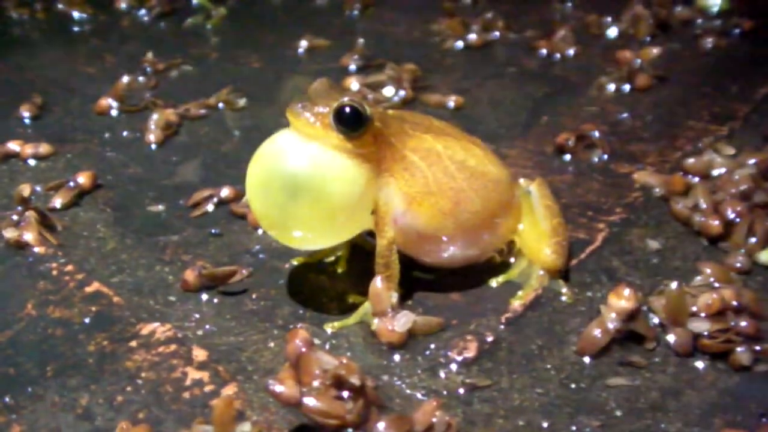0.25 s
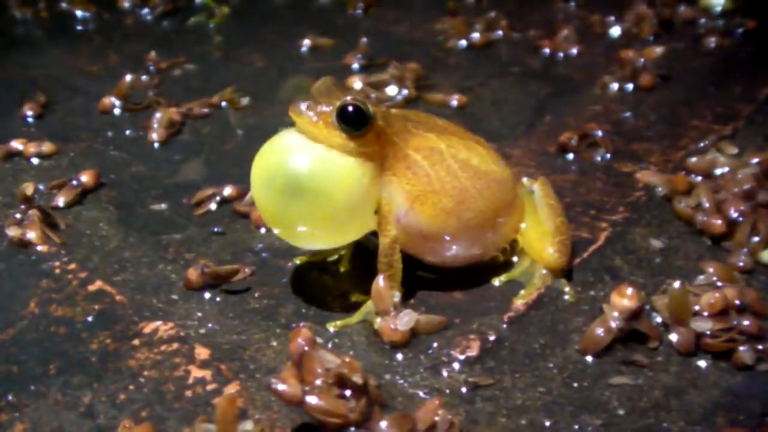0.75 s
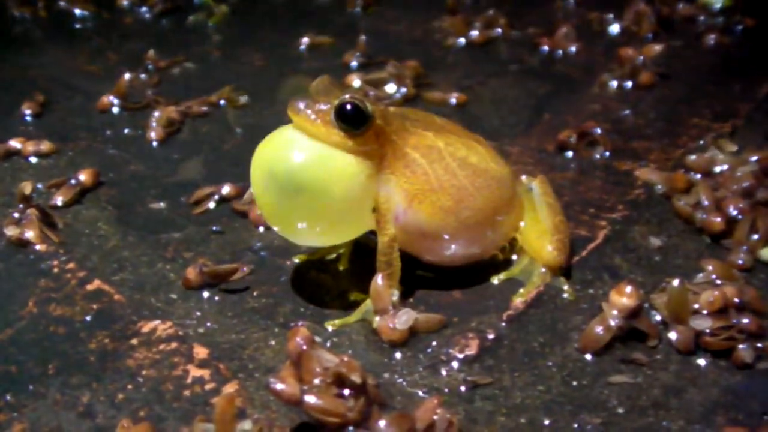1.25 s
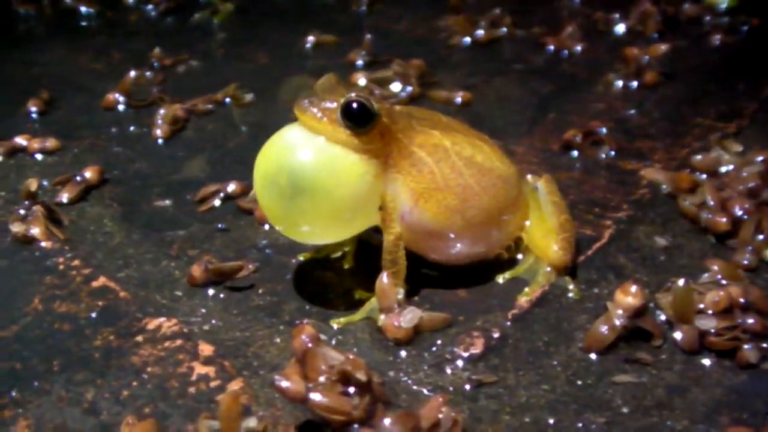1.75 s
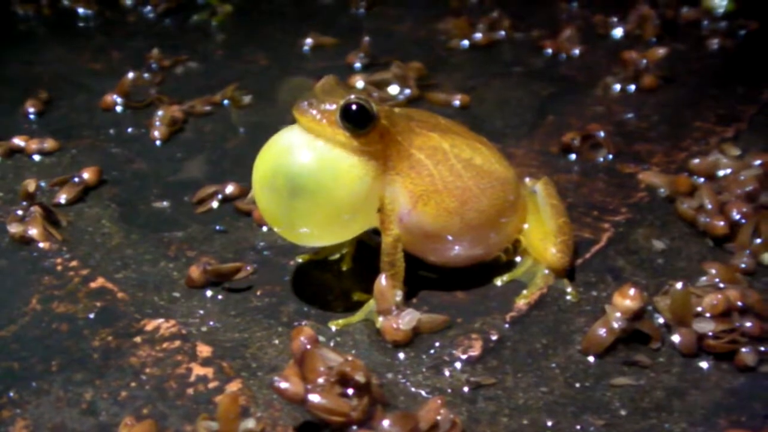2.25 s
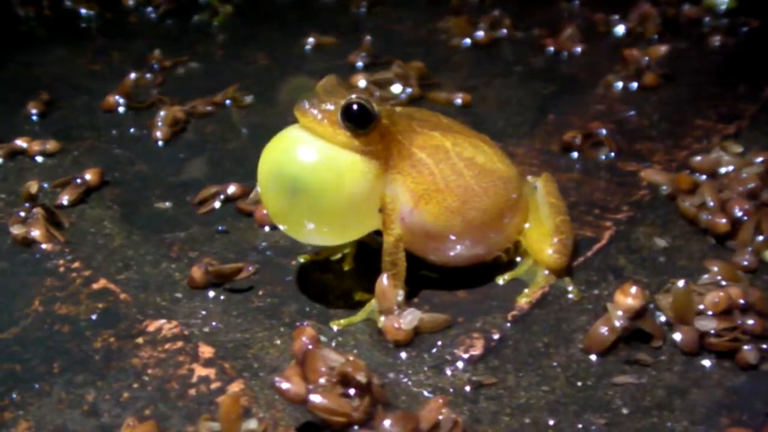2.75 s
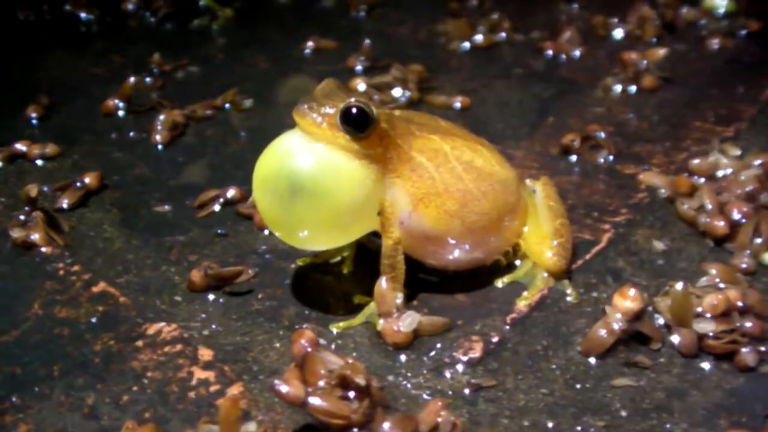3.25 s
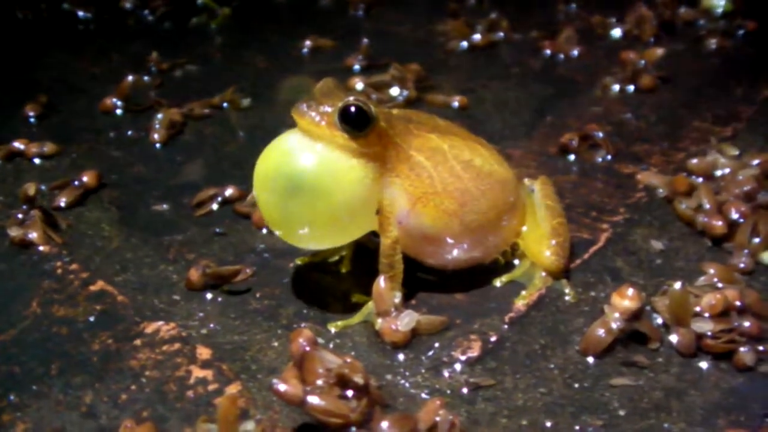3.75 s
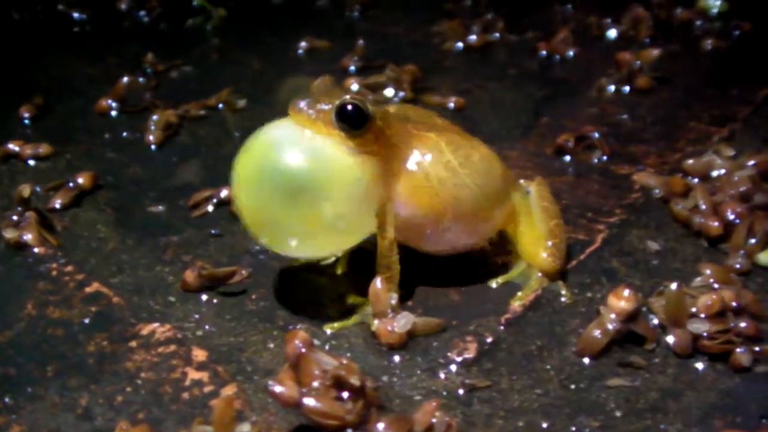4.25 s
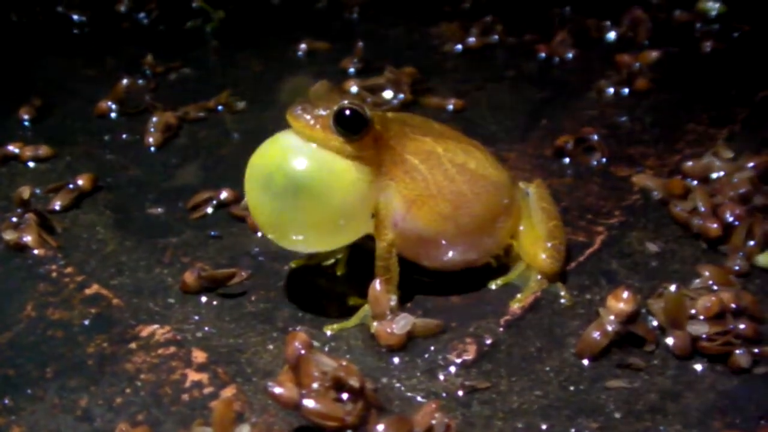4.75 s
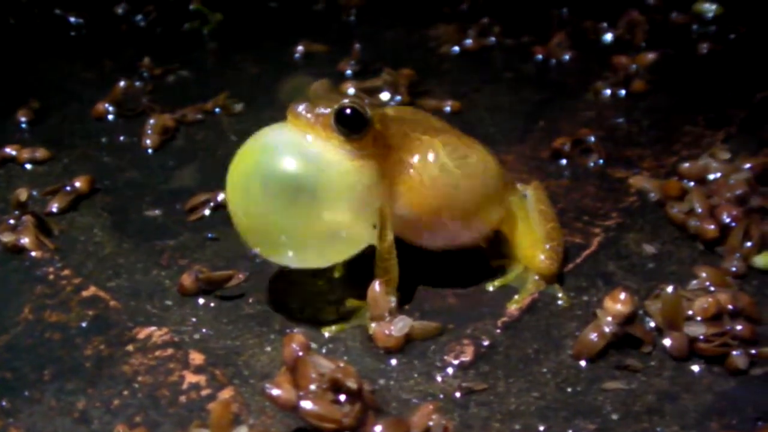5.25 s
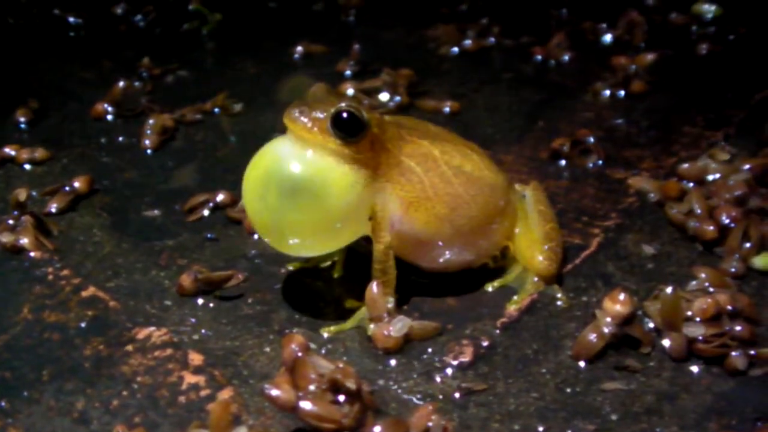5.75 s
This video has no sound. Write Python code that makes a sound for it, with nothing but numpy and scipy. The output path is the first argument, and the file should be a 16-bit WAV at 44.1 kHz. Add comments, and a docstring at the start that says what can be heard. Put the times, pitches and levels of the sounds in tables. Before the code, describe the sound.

Quiet wet night with distant frogs, insect trill and water drips, then three piercing, overloaded close frog chirps, each a fast rising buzz.

```python
"""A small tree frog calls from wet ground at night, a hand's width from the microphone and a little left.
Each note is a buzz of about 240 pulses a second that climbs in pitch and ends in one long pure pulse.
Neighbours call the same note from farther off, with more echo; one whistle rises, and far frogs peep.
Behind them lie a thin insect trill, water drips as short noise bursts, a far chorus and an even hiss.
Close notes overload the microphone into buzz and rasp, and its gain control ducks the night."""
import sys
import numpy as np
from scipy import signal
from scipy.fft import rfft, irfft
from scipy.io import wavfile
from scipy.ndimage import uniform_filter1d, minimum_filter1d

SR = 44100
rng = np.random.default_rng(int(sys.argv[2]) if len(sys.argv) > 2 else 0)


def master(y):
    """Save y as 16-bit WAV."""
    cut = np.clip(np.atleast_2d(y).T, -1, 1)
    pcm = np.round(cut * 32767)  # scale
    wavfile.write(sys.argv[1], SR, pcm.astype(np.int16))


N = 265041
TIME = np.arange(N) / SR   # s

# shape of the night's hiss: pitch_hz, relative level_db per Hz
HISS_SHAPE = [(30, -16), (60, -5), (120, 3), (260, -7), (400, 2.5), (600, -2.5), (1200, -2), (3000, -2.5),
              (5500, -1.5), (7000, -7.5), (8600, -12), (10500, -2), (12500, 0), (15500, -13.5)]
HISS_DB = -51   # level of the whole hiss
# how alike the hiss is at left and right: pitch_hz, likeness (0-1)
HISS_LIKENESS = [(60, 0.51), (150, 0.73), (380, 0.8), (950, 0.43), (2380, 0.72), (5980, 0.04),
                 (15000, 0.12)]
# far chorus of frogs and insects: centre_hz, width_hz, level_db, flutter_db (either way)
FAR_CHORUS = [(407, 73, -66, 7.5), (2133, 160, -66, 6.5), (4285, 345, -52, 10.5), (6253, 92, -63, 9.5),
              (5940, 600, -64.5, 10)]
# level of the nearer insect's trill: time_s, level_db
TRILL_LEVEL = [(0, -56.5), (1.08, -54), (1.22, -61), (3.8, -61), (4.7, -49), (6, -66)]
# the clearest drips on leaves and mud: start_s, level_db (tick and thud), struck_spot_hz, spray_db
DRIPS = [(0.841, -32, 407, -42), (0.871, -31.5, 1770, -51), (1.049, -59, 503, -38.5),
         (2.173, -24.5, 1580, -52), (2.197, -35, 1830, -59), (2.469, -29, 420, -65), (2.566, -31, 710, -66),
         (3.337, -37.5, 373, -55), (3.501, -38.5, 900, -64), (3.652, -38.5, 425, -52),
         (3.888, -56, 409, -42), (3.927, -39.5, 434, -61), (3.981, -59, 415, -39), (4.673, -28.5, 969, -45),
         (5.908, -44.5, 455, -40.5)]
# tick set ringing beside the struck spot: low_hz, high_hz, decay_s, gain_db
DRIP_TICK = (2950, 3500, 0.00093, 1.4)
# fine spray of a drip: low_hz, high_hz, decay_s, gain_db
DRIP_SPRAY = (8500, 14500, 0.0029, 2.5)
# two far frogs: pitch_hz, level_db (before echo), rise_hz_per_s, rattle_depth (0-1), peep_centres_s
FAR_PEEPERS = [(4487, -45, 600, .15, (.095, .515, .938, 1.365, 1.755, 2.112, 2.625, 2.975, 3.42, 3.975, 4.66, 5.81)),
               (4235, -42, 2600, .5, (.29, .73, 1.41, 1.69, 2.15, 2.47, 3.0, 3.82, 3.995, 5.59))]
RATTLE_HZ = 210   # rate of the rattle within a peep
PEEP_SPREAD_DB, PEEP_SPREAD_HZ = 1.0, 5.4   # how much one peep differs from the next
# path of the rising whistle: time_s, pitch_hz, level_db (before echo)
WHISTLE_PATH = [(2.401, 3250, -58), (2.429, 3453, -38), (2.477, 3577, -26.5), (2.502, 3672, -28.5),
                (2.534, 3590, -53)]
# neighbours' notes: first_pulse_s, last_pulse_s, level_db (with echo, before the sac), last_pulse_hz, voice
NEIGHBOUR_NOTES = [(-.05, 0.033, -24.5, 3932, "even"), (1.045, 1.124, -13.5, 3490, "swelling"),
                   (1.348, 1.436, -18, 3950, "even"), (1.616, 1.721, -21.5, 3830, "even"),
                   (2.54, 2.649, -16.5, 3904, "even"), (2.636, 2.712, -19, 3964, "even"),
                   (3.022, 3.1237, -4.5, 3664, "swelling"), (3.207, 3.279, -12.5, 3612, "swelling"),
                   (4.682, 4.769, -0.5, 3816, "swelling"), (4.775, 4.783, -3, 3880, "even"),
                   (4.825, 4.909, -15.5, 3930, "even"), (4.898, 4.988, -21, 3780, "swelling"),
                   (5.199, 5.28, 1.5, 3824, "even"), (5.384, 5.45, -21, 3953, "even"),
                   (5.565, 5.666, -21, 3835, "even"), (5.823, 5.922, -14, 3622, "swelling"),
                   (5.950, 6.027, -17.5, 3820, "even")]
# their two ways of calling, by voice: pulses_per_s, start_pitch and end_pitch of the buzz
# (shares of the last pulse's pitch), swell_db, last_pulse_db
NEIGHBOUR_VOICES = {"even": (234, .85, .935, 4.6, 1.9), "swelling": (261, 0.89, 0.9863, 19, 1)}
# fainter means farther and wetter: echo over direct sound for a 0 dB note, and its rise in dB per dB
NEAR_ECHO_DB, ECHO_RISE = -6.5, 0.73
# close frog's notes: first_pulse_s, last_pulse_s, pulses_per_s, level_db (before the sac),
# start_hz, end_hz, last_pulse_hz, swell_db
CLOSE_NOTES = [(4.2548, 4.3769, 246, 29.5, 3330, 3778, 3997, 11),
               (5.018, 5.1344, 240, 30, 3318, 3803, 3987, 8),
               (5.308, 5.3481, 244, 29, 3480, 3734, 4000, 20)]
# loose pulses as its larynx starts up: start_s, level_db (before the sac), length_s
CATCHES = [(4.2427, 4, 0.00046), (4.245, 7.5, 0.00065), (4.2482, 26.5, 0.0013), (5.005, 9, 0.00043),
           (5.012, 30.5, 0.00057), (5.2987, 7, 0.00065)]
CATCH_HZ = 3250   # pitch of those loose pulses
CUTOFF_HZ = 15750   # top of the recorded band


def from_db(db):
    """Decibels to gain."""
    return 10 ** (np.asarray(db) / 20)


def rms_one(x):
    """Scale to an rms of one."""
    return x / np.sqrt(np.mean(x ** 2) + 1e-20)


def at_hz(points, hz):
    """Read a spectrum on a log-frequency axis."""
    points_hz, values = np.array(points).T
    return np.interp(np.log(hz + 1), np.log(points_hz), values)


def band(x, low_hz, high_hz, order=2):
    """Butterworth band-pass."""
    edges = [low_hz, min(high_hz, SR / 2 - 1)]
    return signal.sosfilt(signal.butter(order, edges, "band", fs=SR, output="sos"), x + 1e-18)


def drift(rate):
    """Chance between -1 and 1, drawn anew `rate` times a second and joined by straight lines."""
    knots = rng.uniform(-1, 1, 1000)
    return np.interp(TIME * rate, np.arange(len(knots)), knots)


def delayed(x, delay_s):
    """The same sound, a little later."""
    return np.interp(TIME - delay_s, TIME, x)


def panned(x, pan_db):
    """Raise left over right by pan_db."""
    return x * from_db(np.array([[pan_db], [-pan_db]]) / 2)


def add(out, s, sound):
    """Mix a sound in at time s, trimmed to the ends."""
    at = round(s * SR)
    low, high = max(at, 0), min(at + sound.shape[-1], out.shape[-1])
    if high > low:
        out[..., low:high] += sound[..., low - at:high - at]


def stereo_pair(mid, side, alike):
    """Left and right noise that share a given likeness (0-1)."""
    alike = np.clip(alike, 0, 1)
    return np.sqrt(1 + alike) * mid + np.sqrt(1 - alike) * side * [[1], [-1]]


def foliage(x, echo_db, t60=0.26, build_s=0.00093, alike=0.44):
    """Direct sound plus a dense scatter from leaves and trunks, in stereo."""
    t = TIME[:SR * 3 // 4]
    scatter = stereo_pair(*rng.standard_normal((2, len(t))), alike)
    scatter = scatter * from_db(-60 * t / t60) * (1 - np.exp(-t / build_s))
    response = from_db(echo_db) * rms_one(scatter) / np.sqrt(len(t))
    response[:, 0] += 1   # the direct sound
    return signal.fftconvolve(x[None], response, axes=1)


def burst(low_hz, high_hz, decay_s, db, order=2):
    """A band of noise that starts to die at once."""
    t = TIME[:SR // 20]
    noise = band(rng.standard_normal(len(t)), low_hz, high_hz, order)
    return from_db(db) * rms_one(noise) * np.exp(-t / decay_s)


def hiss():
    """The night's even hiss: shaped noise whose left-right likeness depends on pitch."""
    hz = np.arange(N // 2 + 1) * SR / N
    mid, side = rfft(rng.standard_normal((2, N)))
    spectrum = stereo_pair(mid, side, at_hz(HISS_LIKENESS, hz)) * from_db(at_hz(HISS_SHAPE, hz))
    return from_db(HISS_DB) * rms_one(irfft(spectrum, N))


def far_chorus():
    """Many far frogs and insects merge into bands of fluttering noise."""
    out = np.zeros((2, N))
    for centre, width, db, flutter_db in FAR_CHORUS:
        # noise common to both sides plus stronger noise of each side's own
        noise = rng.standard_normal(N) + 2.05 * rng.standard_normal((2, N))
        voices = band(noise, centre - width / 2, centre + width / 2)
        out += from_db(db + flutter_db * drift(22)) * rms_one(voices)
    return out


def patter(drops_per_s=25, level_db=-65):
    """Distant drops: random clicks, dulled and scattered by the foliage."""
    drops = (rng.random(N) < drops_per_s / SR) * rng.standard_normal(N)
    dulled = band(drops, 320, 1760, order=1)
    return from_db(level_db) * rms_one(foliage(dulled, echo_db=-17, t60=0.16)[:, :N])


def insect():
    """One nearer insect: a thin line of noise that drops back after a second and returns later."""
    line = band(rng.standard_normal((2, N)), 5105, 5215)
    return from_db(np.interp(TIME, *np.transpose(TRILL_LEVEL))) * rms_one(line)


def drips(spread=1.24, thud_cycles=1.91, thud_db=-1):
    """Each drop gives a tick, a thud that dies within a few cycles, and a little spray."""
    out = np.zeros((2, N))
    for s, db, hz, spray_db in DRIPS:
        thud = burst(hz / spread, hz * spread, thud_cycles / hz, thud_db, order=1)
        blow = thud + burst(*DRIP_TICK)
        drop = from_db(db) * blow + from_db(spray_db) * burst(*DRIP_SPRAY)
        add(out, s, foliage(drop, echo_db=-7.0, t60=0.073))
    return out


def peepers(width_s=0.024, lower_db=-14):
    """Short rising peeps, a little rattly, strongest on their second harmonic and blurred by distance."""
    out = np.zeros((2, N))
    t = TIME[:SR // 8] - 1 / 16   # zero at the middle of the peep
    for hz, db, rise, rattle, times in FAR_PEEPERS:
        chance = rng.standard_normal((len(times), 2)) * [PEEP_SPREAD_DB, PEEP_SPREAD_HZ]
        shape = np.exp(-(t / width_s) ** 2) * (1 + rattle * np.sin(2 * np.pi * RATTLE_HZ * t))
        for s, (strong_db, sharp_hz) in zip(times, chance):
            phase = np.pi * t * (hz + sharp_hz + rise * t / 2)   # of the fundamental, at half the pitch
            peep = shape * (np.sin(2 * phase) + from_db(lower_db) * np.sin(phase))
            add(out, s + t[0], from_db(db + strong_db) * foliage(peep, echo_db=0.5, t60=0.2))
    return panned(out, 5.0)


def voiced(phase, second_db=-27):
    """The fundamental and a trace of its octave."""
    return np.sin(phase) + from_db(second_db) * np.sin(2 * phase)


def whistler():
    """One smooth upward whistle: a gliding tone that sags slightly as it fades."""
    s, hz, db = np.transpose(WHISTLE_PATH)
    level = np.interp(TIME, s, from_db(db), 0, 0)
    tone = level * voiced(2 * np.pi * np.cumsum(np.interp(TIME, s, hz)) / SR)
    return panned(foliage(tone, echo_db=0.5)[:, :N], 4.6)


def pulse(hz, length_s, turns=0, attack_s=0.00044, ring_s=0.002, ring_share=0.42,
          scoop=0.057, scoop_s=0.0008):
    """One opening of the larynx: the cords scoop up to pitch and stop, the sac rings on."""
    t = TIME[:SR // 70]
    attack = 1 - np.exp(-(t / attack_s) ** 2)
    shape = attack * (np.exp(-(t / length_s) ** 2) + ring_share * np.exp(-t / ring_s))
    scooped_t = t - scoop * scoop_s * (1 - np.exp(-t / scoop_s))
    return shape * voiced(2 * np.pi * (turns + hz * scooped_t))


def last_pulse(hz, length_s=0.0078, attack_s=0.00069, scoop=0.054, scoop_s=0.0024):
    """The larynx stays open: a pure tone that slides up to its pitch."""
    t = TIME[:SR // 50]
    shape = (1 - np.exp(-(t / attack_s) ** 2)) * np.exp(-(t / length_s) ** 6)
    return shape * voiced(2 * np.pi * np.cumsum(hz * (1 - scoop * np.exp(-t / scoop_s))) / SR)


def note(span, per_s, start_hz, end_hz, last_hz, swell_db, last_db, full_at, fade_s,
         short_s=0.0015, long_s=0.0016, bend=0.53, slip=0.12, wander_hz=55):
    """A pulse train that swells, rises in pitch, lengthens its pulses a little and ends in a pure one."""
    out = np.zeros(SR // 5)
    count = max(round(span * per_s), 1)
    # chance for each pulse: timing s, level dB, phase slip, pitch
    chance = rng.standard_normal((60, 4)) * [.00004, .9, 1, 1]
    turns = 0
    for k in range(count):
        along = k / count
        early_s, strong_db, slipped, off_pitch = chance[k]
        swell = from_db(-swell_db * max(1 - along / full_at, 0) + strong_db)
        level = swell * min((k + 1) / (per_s * fade_s), 1)
        hz = start_hz + (end_hz - start_hz) * along ** bend
        # the cords keep swinging between pulses, so the sidebands glide up with the pitch
        phase = turns + hz * early_s + slip * slipped
        length_s = short_s + (long_s - short_s) * along
        add(out, along * span + early_s, level * pulse(hz + wander_hz * off_pitch, length_s, phase))
        turns += hz * span / count
    add(out, span, from_db(last_db) * last_pulse(last_hz))
    return out


def vocal_sac(x, low_hz, high_hz):
    """The small sac radiates only a band around its resonance."""
    return band(x, low_hz, high_hz, order=5)


def neighbours(leak_db=-4, pan_db=4.0):
    """The same note from farther off; the fainter it arrives, the more of it is echo."""
    out = np.zeros((2, N))
    for first, last, db, hz, voice in NEIGHBOUR_NOTES:
        per_s, start_share, end_share, swell_db, last_db = NEIGHBOUR_VOICES[voice]
        echo_db = NEAR_ECHO_DB - ECHO_RISE * db
        # direct and echoed power together make up the note's level
        direct = from_db(db) / np.hypot(1, from_db(echo_db))
        call = direct * note(last - first, per_s, start_share * hz, end_share * hz, hz,
                             swell_db, last_db, full_at=0.48, fade_s=0.011)
        leak = from_db(leak_db) * band(call, 5050, 7070, order=3)
        call = vocal_sac(call, low_hz=2680, high_hz=4280) + leak
        add(out, first, foliage(call, echo_db, t60=0.34, alike=0.69))
    return panned(out, pan_db)


def close_frog(lag_s=.00002, waver_db=5.5, leak_db=-9):
    """Three notes right at the microphone, a little to the left, with a faint return from the foliage."""
    out = np.zeros(N)
    for first, last, per_s, db, *voice in CLOSE_NOTES:
        call = note(last - first, per_s, *voice, last_db=0.5, full_at=0.47, fade_s=.001)
        add(out, first, from_db(db) * call)
    for s, db, length_s in CATCHES:
        add(out, s, from_db(db) * pulse(CATCH_HZ, length_s))
    # the body leaks some of the octave that the sac holds back
    leak = from_db(leak_db) * band(out, 5760, 7100)
    out = vocal_sac(out, low_hz=2170, high_hz=5020) + leak
    wavering = out * from_db(waver_db * drift(40))
    left, right = foliage(wavering, echo_db=-25.0, t60=0.23)[:, :N]
    return panned(np.array([left, delayed(right, lag_s)]), 3.9)


def scene():
    """Everything that reaches the microphone, from the far night to the close frog."""
    night = hiss() + far_chorus() + patter()
    return night + insect() + drips() + peepers() + whistler() + neighbours() + close_frog()


def capsules(dry, overload_db=27, left_lopsided=0.11, right_lopsided=0.3, left_buzz_db=4, right_buzz_db=9,
             rasp_db=-31, grit_db=-40, rumble_db=-35, waver_db=4, sizzle_db=-10, rumble_lag_s=0.0058):
    """Overload rounds the peaks lopsidedly: overtones, a low buzz at the pulse rate, and a rough edge."""
    top = from_db(overload_db)
    bent = np.tanh(dry / top)
    waver = from_db(waver_db * np.array([drift(44), drift(60)]))
    squared = bent ** 2 * [[left_lopsided], [right_lopsided]] * waver
    sizzle = from_db(sizzle_db) * band(bent ** 4, 12000, 16000)
    overtone = band(squared, 3500, 10000, order=1) + sizzle
    left, right = band(squared, 428, 678, order=1)
    # the right capsule buzzes thinner and out of step
    right = band(right, 900, 5100, order=1)
    buzz = np.array([from_db(left_buzz_db) * left, from_db(right_buzz_db) * right])
    # rough noise rides on every loud pulse
    strain = np.sqrt(np.maximum(uniform_filter1d(bent ** 2, SR // 400), 0))
    rasp_noise = rms_one(band(rng.standard_normal((2, N)), 4200, 13000))
    rasp = from_db(rasp_db + waver_db * drift(78)) * rasp_noise
    grit = from_db(grit_db) * rms_one(band(rng.standard_normal((2, N)), 460, 3600, order=1))
    rumble_noise = rms_one(band(rng.standard_normal(N), 21, 210, order=1))
    rumble = from_db(rumble_db + waver_db * drift(30)) * rumble_noise
    # the rumble builds more slowly under a note and lingers a moment
    r = np.exp(-1 / (rumble_lag_s * SR))
    load = signal.lfilter([1 - r], [1, -r], strain)
    return top * (bent + overtone + buzz + strain * (rasp + grit) + load * rumble)


def gain_control(x, limit, attack_s, hold_s, recover_per_s, ahead_s=0.00021):
    """Gain drops when peaks pass the limit, holds, then climbs back at a steady rate."""
    hold, ahead = max(int(hold_s * SR / 2), 1), int(ahead_s * SR)
    wanted = limit / np.maximum(np.abs(x).max(axis=0), limit)
    held = minimum_filter1d(wanted, 2 * hold + 1, origin=hold)
    climb = recover_per_s * TIME
    gain = np.minimum.accumulate(held - climb) + climb
    r = np.exp(-1 / (attack_s * SR))
    smooth = np.exp(signal.lfilter([1 - r], [1, -r], np.log(gain)))
    return x * np.pad(smooth[ahead:], (0, ahead), "edge")


def record(dry):
    """The capsules overload; gain control and a fast limiter follow, and the top is cut."""
    levelled = gain_control(capsules(dry), limit=0.71, attack_s=0.0053, hold_s=0.057, recover_per_s=2.8)
    limited = gain_control(levelled, limit=1.0, attack_s=.0001, hold_s=0.0018, recover_per_s=420,
                           ahead_s=0.0001)
    top_cut = signal.ellip(10, .1, 80, CUTOFF_HZ, fs=SR, output="sos")
    return signal.sosfilt(top_cut, np.clip(limited, -1, 1))


dry = scene()
out = record(dry)
master(out)
```